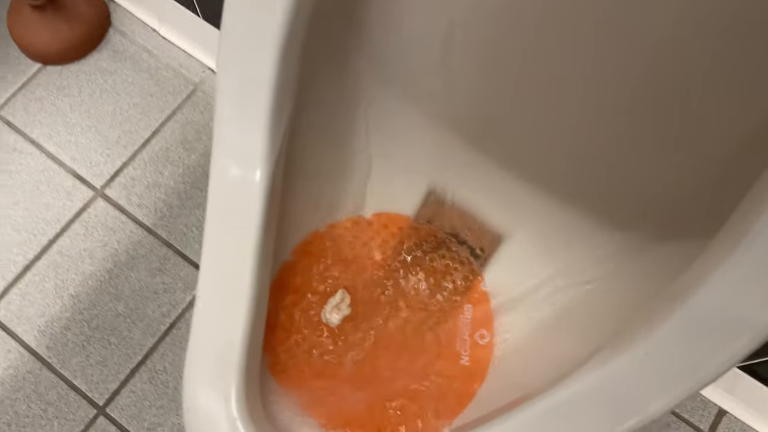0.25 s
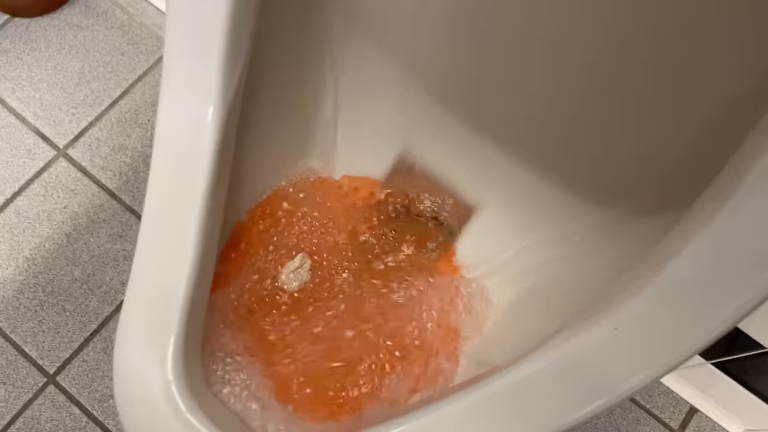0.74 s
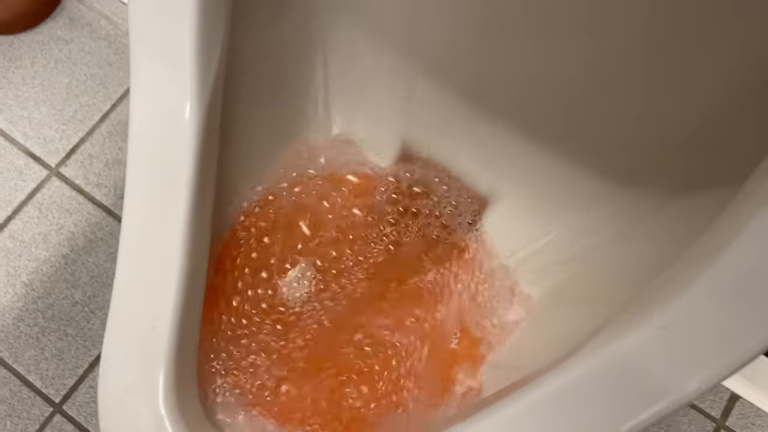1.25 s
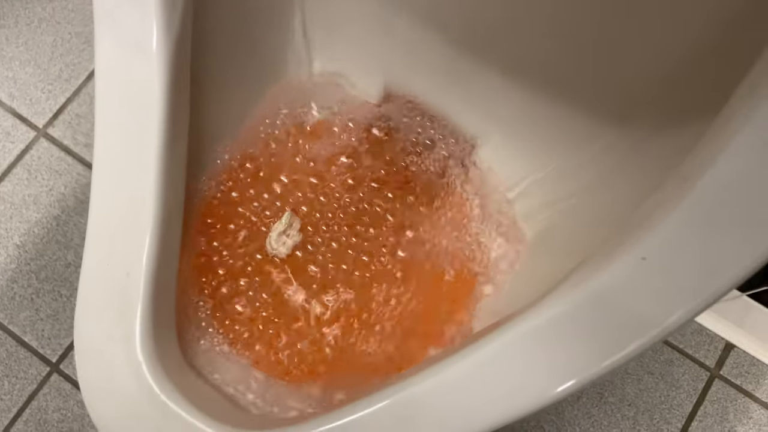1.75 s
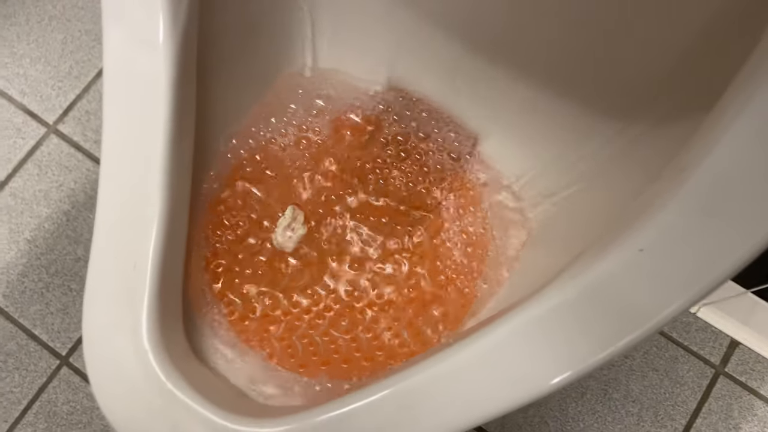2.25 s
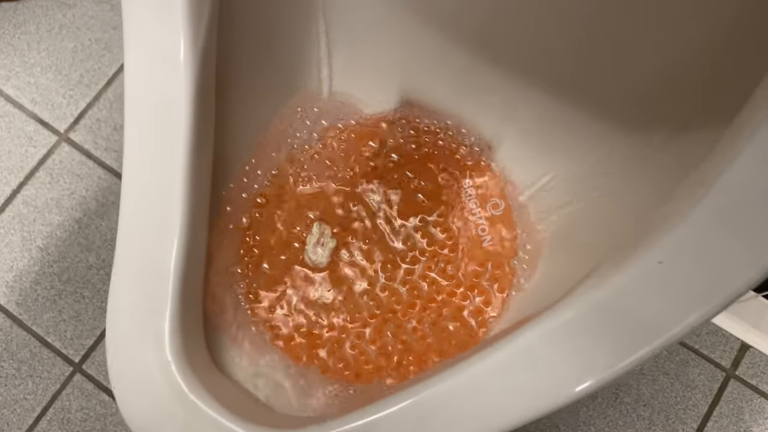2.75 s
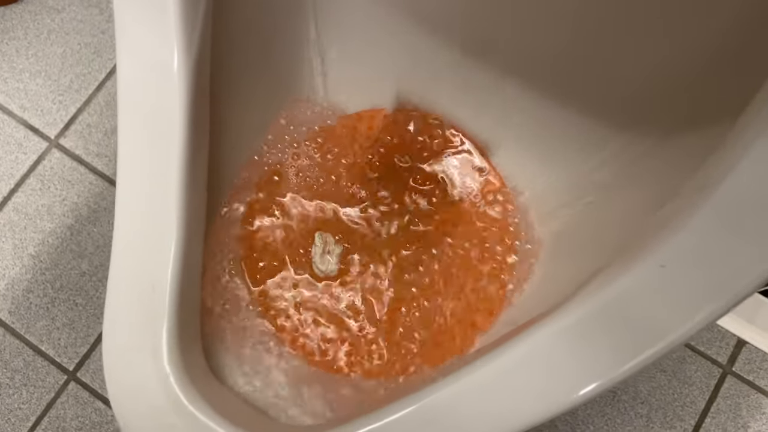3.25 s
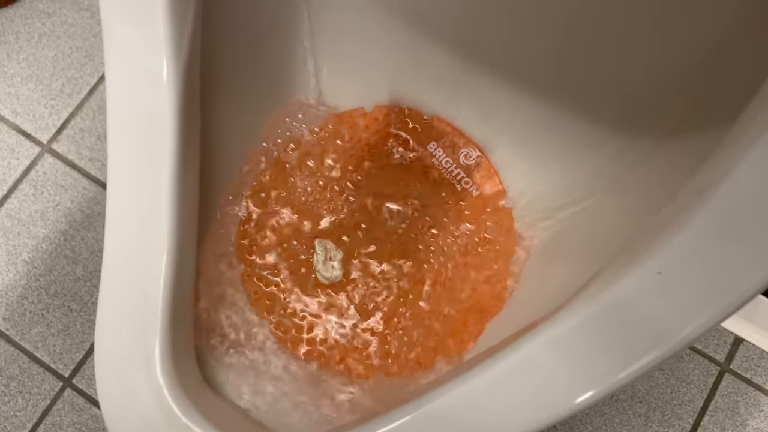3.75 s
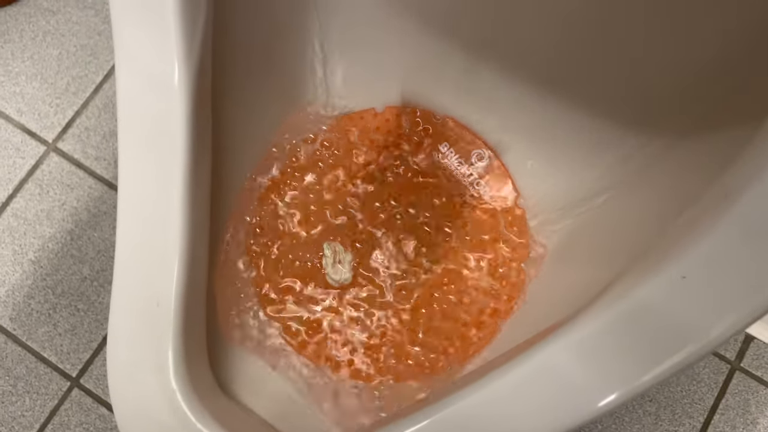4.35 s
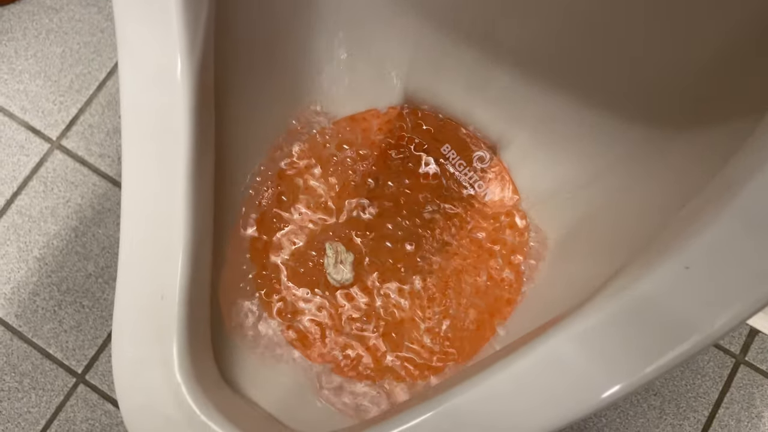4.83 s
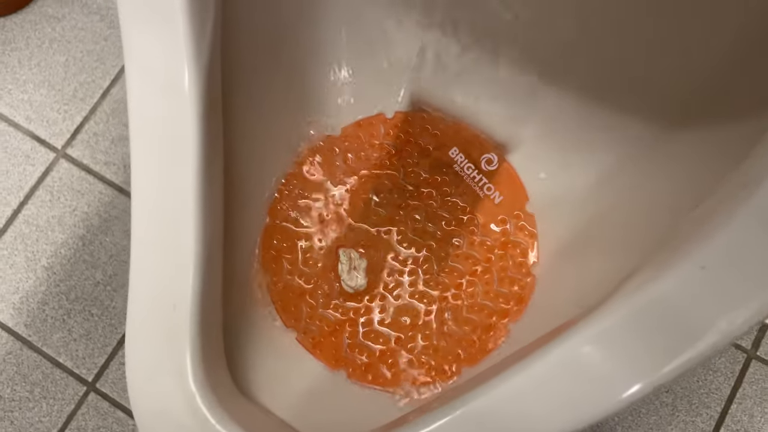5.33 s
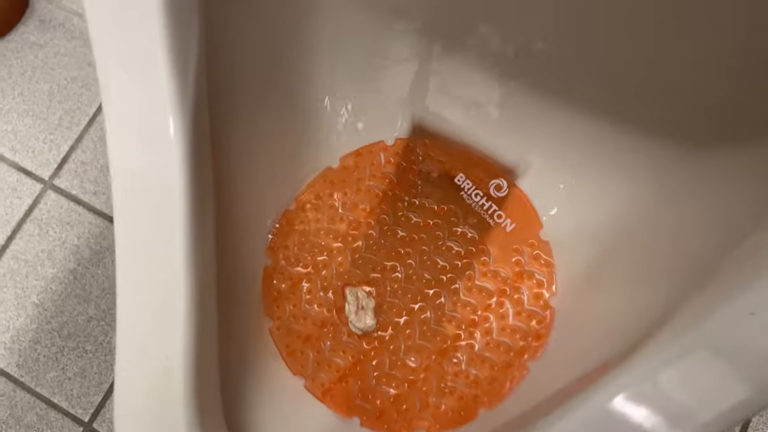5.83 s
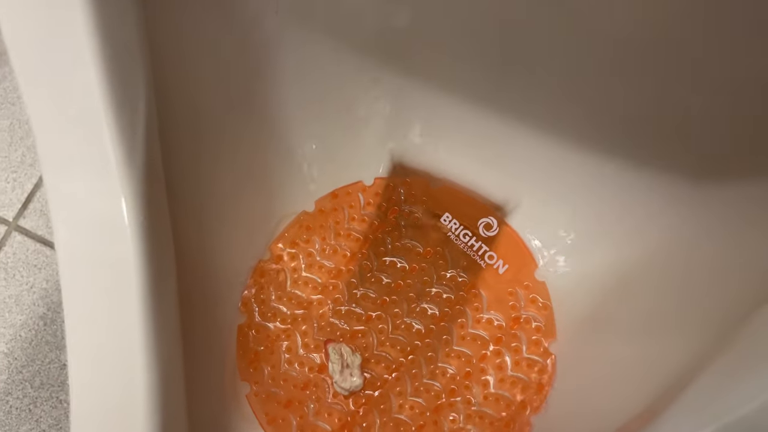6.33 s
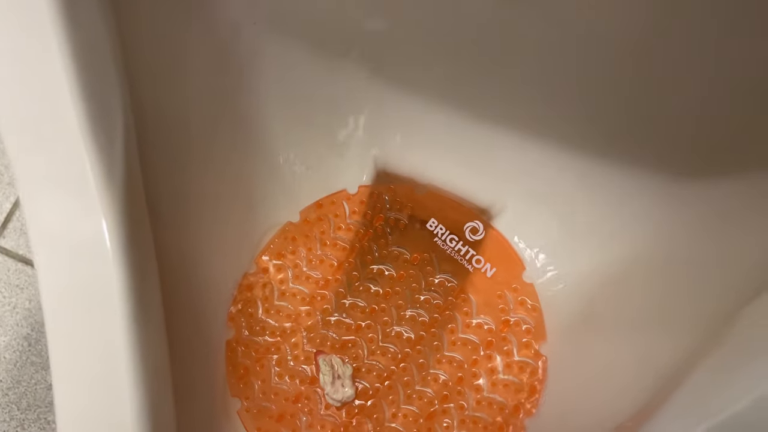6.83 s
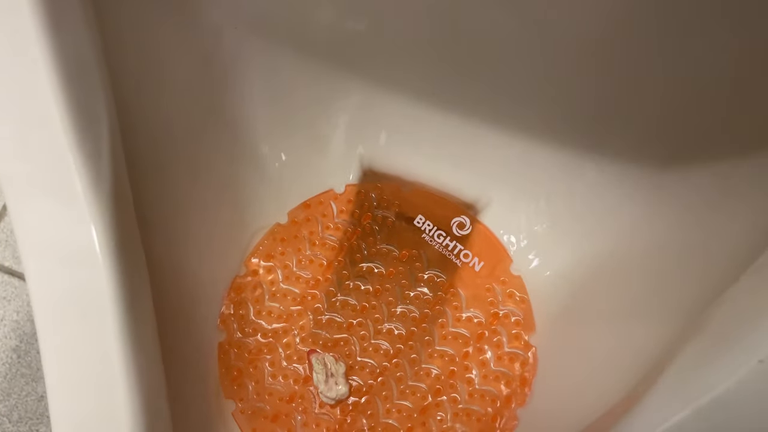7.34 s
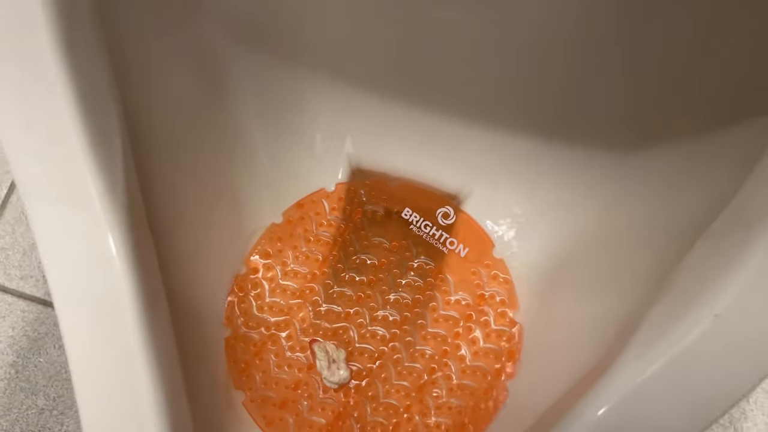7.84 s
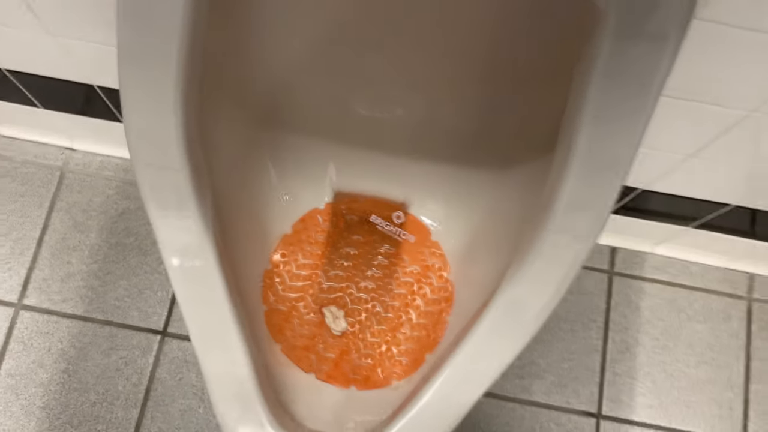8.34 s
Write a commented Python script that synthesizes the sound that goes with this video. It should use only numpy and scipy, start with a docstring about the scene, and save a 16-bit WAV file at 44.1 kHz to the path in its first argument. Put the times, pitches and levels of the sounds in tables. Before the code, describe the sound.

Water hisses down porcelain and glugs in the trap, air sputters, a quiet trickle follows, and the bowl empties with sudden loud gulps.

```python
"""Spray hisses down the porcelain of a wall urinal in a tiled restroom and fades while the trap fills and glugs.
The valve shuts and air sputters through the rim holes; the bowl drains with a rumble and a trickle.
The siphon breaks in a loud gurgle, one last sputter follows, then a brief scuff.
Hisses and rumbles are shaped noise, bubbles are gliding tones that swell and die; bowl resonances and
echoes off the walls place them. All is heard in stereo, the water's two channels differing in phase."""
import sys
import numpy as np
from scipy import signal
from scipy.fft import rfft, irfft, next_fast_len
from scipy.io import wavfile

SR = 44100
rng = np.random.default_rng(int(sys.argv[2]) if len(sys.argv) > 2 else 0)


def inscribe(sig):
    """Save sig as 16-bit PCM at rate SR to the path in sys.argv[1].

    A 1-D sig is mono; a 2-D sig holds one channel per row.
    Samples are clipped to [-1, 1] before scaling.
    """
    pcm = np.round(np.clip(np.atleast_2d(sig).T, -1, 1) * 32767)
    wavfile.write(sys.argv[1], SR, pcm.astype(np.int16))


N = 378357
TIME = np.arange(N) / SR   # s
SIZE = next_fast_len(N + SR, real=True)   # transform length, with room for tails
HZ = np.maximum(np.arange(SIZE // 2 + 1) * SR / SIZE, 1)   # frequency of every transform bin

# air resonances of the bowl and trap: centre_hz, width_hz, level_db (over the direct sound)
BOWL_MODES = [(343.3, 12.1, 7.5), (599.5, 10, -4), (718.5, 26, 5), (1019, 33, 2), (1358, 117, 4),
              (1666, 31, 4.5), (2670, 120, 4)]
# air churned into the pool: time_s, level_db, bubble_pitch_hz
POOL_CHURN = [(0, -35.5, 430), (.5, -34, 376), (1.25, -38, 348), (1.8, -41.5, 271), (2.35, -33.5, 359),
              (2.9, -41.5, 424.3), (3.5, -38.5, 417), (4.0, -44, 436), (4.6, -48.5, 399)]
# the big gulps of air as the siphon breaks: start_s, level_db, nominal_pitch_hz, thrown_spray_db
BIG_GULPS = [(6.834, -3.5, 643, -30), (6.866, -7, 452, -33), (6.926, -7, 674, -35.5),
             (6.959, -3.5, 604, -29), (6.986, -12.5, 756, -57), (7.015, -4.5, 706, -28.5),
             (7.042, -14, 466, -29), (7.070, -11, 576, -37), (7.104, -6.5, 547, -26),
             (7.164, -14, 684, -62), (7.184, -7, 564, -32), (7.212, -8, 664, -31), (7.237, -6, 710, -30),
             (7.335, -4.5, 790, -26), (7.377, -13, 573, -49), (7.434, -8.5, 690, -31.5),
             (7.472, -9, 762, -34.5), (7.641, -12, 606, -46)]
# spectrum of fine droplets: frequency_hz, density_db (per Hz)
MIST_SPECTRUM = [(1800, -12), (4000, 2), (6500, -1), (8400, -5), (10500, 1), (13800, -5), (14800, -30)]


def flush(bowl):
    """Jets hiss on the porcelain, splash into the pool and make the trap drone; they run out once the valve shuts."""
    # spectra: frequency_hz, density_db (per Hz)
    spray_spectrum = [(1300, -66), (2200, -3), (4000, 5), (6500, 5), (8400, -0.5), (10500, 8), (12500, 2),
                      (13800, 7.5), (14700, -37)]
    splash_spectrum = [(400, -66), (650, 3), (900, 2.5), (2000, 3), (3200, -9.5)]
    jets, gush = flow()
    hiss = np.hypot(jets, gush)
    splash = np.hypot(from_db(-6) * jets, gush)   # the gush splashes as strongly as it hisses
    spray = patter(bowl * response(spray_spectrum), per_s=2000, spread_db=4.8, smooth_db=-2,
                   surge_db=1.5, surge_rate=28)
    wash = patter(bowl * response(splash_spectrum), per_s=700, spread_db=3.2, smooth_db=-2,
                  surge_db=2, surge_rate=18)
    lowest_mode = resonance(BOWL_MODES[:1])
    drone = from_db(-21.5) * jets * rms_one(filtered(rng.standard_normal(N), lowest_mode ** 2))
    froth = from_db(-11) * fizz(per_s=220, low_hz=1500, high_hz=7000, spread_db=4.5, cycles=2.6)
    return hiss * (spray + froth) + splash * wash + drone


def flow(shut_s=4.68, run_out_s=0.079):
    """Strength of the rim jets, a steady flow plus a head of pressure that runs down, and of their first gush."""
    steady_db, head_db, head_fall_db_per_s = -34, -18.5, 9.5
    gush_db, gush_s, gush_length_s = -23, 0.18, 0.06
    closing_s, closing_db_per_s = 3.73, 4.5   # the valve starts to close before it shuts
    head = from_db(head_db - head_fall_db_per_s * TIME)
    closing = from_db(-closing_db_per_s * np.maximum(TIME - closing_s, 0))
    run_out = np.exp(-np.maximum(TIME - shut_s, 0) / run_out_s)
    jets = closing * run_out * np.hypot(from_db(steady_db), head)
    gush = from_db(gush_db) / (1 + ((TIME - gush_s) / gush_length_s) ** 2)
    return jets, gush


def gurgle(bowl):
    """Each gulp sinks in pitch as its cavity opens; closing water sloshes, throws droplets and rings the trap."""
    # air resonances of the trap: centre_hz, width_hz, level_db
    trap_modes = [(333, 12, 11), (1330, 34, 3), (2650, 48, -13.5)]
    # the first and the last air squeeze through the trap, chirping down: start_s, level_db, pitch_hz, swell_s
    squirt_rows = [(6.857, -21, 2400, .0065), (7.807, -13, 1100, .0015)]
    rows = gulp_rows()
    span = (BIG_GULPS[0][0], BIG_GULPS[-1][0] + .1)   # s
    gulps = bubbles(rows, glide=-.3, wobble=.06)
    # a slap, then the water settles
    force = bursts(rows, swell=0.0033) + from_db(-9.0) * bursts(rows, swell=0.0092)
    # only the big gulps throw water, which patters back
    thrown = [(s, spray_db) for s, _, _, spray_db in BIG_GULPS]
    spatter = bursts(thrown, swell=0.0024) + from_db(-12) * bursts(thrown, swell=0.0097)
    droplets = from_db(-6) * fizz(per_s=700, low_hz=1800, high_hz=6200, spread_db=4, cycles=3.5, span=span)
    mist = rms_one(filtered(rng.standard_normal(N), response(MIST_SPECTRUM)))
    mist = from_db(-12.5) * mist * from_db(5.5 * drift(120))   # flickers in level
    slosh = from_db(-14.0) * fizz(per_s=290, low_hz=257.4, high_hz=945, spread_db=0.5, cycles=2.37, span=span)
    dulled_trap = resonance(trap_modes) / (1 + (HZ / 6000) ** 2)
    ringing = filtered(force * rng.standard_normal(N), dulled_trap)
    squirt = bubbles(squirt_rows, glide=-.65)
    in_bowl = from_db(-3.2) * gulps + force * slosh + spatter * (droplets + mist)
    return filtered(in_bowl, bowl) + ringing + squirt


def gulp_rows(scatter=0.311, small_swell_s=0.00787):
    """Big sharp gulps and the softer crowd between them, scattered in pitch (octaves): rows (s, dB, Hz, swell s)."""
    swell_s, sag = 0.0025, 0.92   # time to full strength; share of its pitch that a big gulp has left by then
    pause_start_s, pause_end_s = 7.25, 7.32   # the trap seals again for a moment
    # the lesser gulps weaken as the bowl empties
    small = crowd(span=(6.89, 7.66), per_s=30, db=-11.5, fall_db_per_s=15)
    pitch = 471.4 * 2 ** (scatter * rng.standard_normal(len(small)))   # Hz
    big_rows = [(s, db, sag * hz, swell_s) for s, db, hz, _ in BIG_GULPS]
    small_rows = [(s, db, hz, small_swell_s) for (s, db), hz in zip(small, pitch)
                  if not pause_start_s < s < pause_end_s]
    return big_rows + small_rows


def bloops(cycles=3.45, rise=0.13):
    """Rounder, wobbling bubbles among the gulps rise in pitch as they surface; the lower, the longer they ring."""
    # softer air pockets: start_s, level_db, pitch_hz
    bloop_rows = [(6.914, -10.5, 562), (6.93, -17.5, 1000), (7.084, -18, 330), (7.209, -18, 335),
                  (7.378, -10, 604), (7.471, -16, 1280), (7.501, -22, 1340), (7.532, -27, 356),
                  (7.603, -20, 347), (7.704, -21, 651)]
    return bubbles([(s, db, hz, cycles / hz) for s, db, hz in bloop_rows], glide=rise, wobble=0.063)


def glugs(swell=0.0054, scatter=0.067):
    """Big round bubbles in the trap ring near the pitch of the pool (scatter in octaves) and rise a little."""
    # the biggest air pockets rising in the full trap: start_s, level_db
    glug_rows = [(2.130, -29), (2.367, -18), (2.42, -22), (2.455, -22.5), (2.495, -20.5), (2.537, -19.5),
                 (2.561, -18), (2.665, -21), (2.794, -18), (2.89, -25), (3.02, -24), (3.125, -22),
                 (3.182, -22), (3.218, -24), (3.263, -15), (3.288, -23), (3.337, -14.5), (3.488, -16.5),
                 (3.512, -17.5), (3.548, -21), (3.608, -20.5), (4.12, -18.5), (4.334, -24.5)]
    small = crowd(span=(2, 3.6), per_s=8.3, db=-25.5)   # lesser ones rise between them
    s, db = np.vstack([glug_rows, small]).T
    pool_s, _, pool_hz = np.transpose(POOL_CHURN)
    hz = np.interp(s, pool_s, pool_hz) * 2 ** (scatter * rng.standard_normal(len(s)))
    return bubbles(zip(s, db, hz, np.full(len(s), swell)), glide=0.029, wobble=0.1)


def pool(per_s=110, scatter=0.229, cycles=2.05):
    """A crowd of big bubbles rolls in the pool, scattered (octaves) round a pitch that follows the water level."""
    s, db, hz = np.transpose(POOL_CHURN)
    when = rng.random(int(per_s * N / SR)) * N / SR
    pitch = np.interp(when, s, hz) * 2 ** (scatter * rng.standard_normal(len(when)))
    churn, = gains(np.transpose([s, db]))
    return churn * rms_one(bubbles(zip(when, np.zeros(len(when)), pitch, cycles / pitch), glide=0.35))


def sputter(bowl):
    """Air breaks through water left in the rim: spit and froth over a hollow, bubbling rattle;
    later a hollow rattle with fainter spit and bursting films."""
    # air and water spitting, one curve a bout: time_s, spit_db, hollow_body_db
    bouts = [
        [(4.705, -28, -58), (4.789, -20, -35.5), (4.873, -37.5, -32), (4.967, -28.5, -29),
         (5.199, -24.5, -36.5), (5.25, -28, -30.5), (5.32, -35, -37), (5.39, -29.5, -31.5), (5.53, -33, -29)],
        [(7.915, -26, -31), (7.951, -22, -26), (8.077, -19, -27), (8.085, -23, -32.5)],
    ]
    # spectra: frequency_hz, density_db (per Hz)
    spit_spectrum = [(1200, -19.5), (2150, 5.5), (3800, -6), (5800, 0.5), (8400, -6.5), (11000, 0),
                     (13500, -1), (16000, -16)]
    hollow_spectrum = [(130, -41), (280, 5), (450, -0.5), (1100, -8.5), (1800, -17.5), (3000, -34)]
    (spit, body), (late_spit, late_body) = [gains(bout, rise=0.0011, fall=0.031) for bout in bouts]
    # as the rim empties the jet breaks into spurts
    ragged_db = np.interp(TIME, [4.8, 5.2], [1.2, 3.6])
    spurts = from_db(ragged_db * (np.minimum(drift(62), 2) - 4.5))
    spitting = spurts * patter(bowl * response(spit_spectrum), per_s=900, spread_db=3.4, smooth_db=-7,
                               surge_db=1, surge_rate=70)
    rattle = patter(bowl * response(hollow_spectrum), per_s=700, spread_db=1.5, smooth_db=-3,
                    surge_db=1.8, surge_rate=35)
    blips = fizz(per_s=90, low_hz=290, high_hz=900, spread_db=2.5, cycles=3.2, span=(4.9, 5.55))
    froth = fizz(per_s=600, low_hz=3400, high_hz=7000, spread_db=4.5, cycles=2.0, span=(4.98, 5.24))
    films = fizz(per_s=300, low_hz=2100, high_hz=7000, spread_db=4.5, cycles=2.0, span=(7.91, 8.09))
    late = from_db(-18) * films + from_db(-8) * spitting
    bubbling = filtered(from_db(-6) * body * blips + from_db(-39.5) * froth, bowl)
    hollow = (body + late_body) * rattle + bubbling
    return spit * spitting + late_spit * late + hollow


def slaps():
    """Lumps of water land with a short wet spit, each coloured by the air it traps."""
    # slaps and splats on the porcelain and the pool: start_s, level_db, centre_hz
    slap_rows = [(3.299, -24, 1400), (3.374, -27, 4700), (3.886, -28.5, 2030), (3.972, -23.5, 3120),
                 (4.703, -26, 5040), (5.284, -31, 6040), (5.339, -27, 5250), (5.8477, -35, 2110),
                 (5.953, -34, 1030), (6.353, -43, 5300), (6.471, -44, 5680), (6.533, -37, 3920),
                 (6.587, -29, 1400), (7.239, -28, 3640), (7.472, -27.5, 2070), (7.912, -33, 4570),
                 (7.972, -27.5, 4950), (8.02, -23, 4300), (8.058, -29, 5350)]
    return spits(slap_rows, swell_s=0.0016, sharpness=1.75)


def drops(cycles=4.1):
    """Drops plink in the bowl and a thin trickle goes on after the flush; finer drips are fainter and higher."""
    # single drops and small bursting bubbles: start_s, level_db, pitch_hz
    drop_rows = [(3.056, -27, 853), (3.852, -28, 579), (4.122, -34.5, 674), (5.234, -28.5, 691),
                 (5.307, -27.5, 2870), (5.365, -29.5, 2850), (5.710, -31.5, 661)]
    plinks = bubbles([(s, db, hz, cycles / hz) for s, db, hz in drop_rows], glide=-0.059, wobble=0.084)
    running, = gains([(5.3, -52.5), (6.5, -54.5), (7.6, -63), (8.2, -66.5)], rise=0.6, fall=0.57)   # (s, dB)
    when, pitch, size = rng.random((int(220 * N / SR), 3)).T   # 220 drips a second
    hz = 1300 * (12500 / 1300) ** pitch
    db = 5 * np.minimum(-np.log(1 - size), 3) - 16 * pitch
    drips = spits(zip(when * N / SR, db, hz), swell_s=.0012, sharpness=2.2)
    return plinks + running * rms_one(filtered(drips, response(MIST_SPECTRUM)))


def background():
    """The waste pipe rumbles in surges under the air noise of the room; something scuffs briefly at the end."""
    # water falling down the waste pipe: time_s, rumble_db
    drain_curve = [(0.0, -40), (0.55, -36.5), (0.83, -44), (4.73, -46.5), (5.11, -34), (5.95, -39.5),
                   (6.25, -35.5), (6.86, -36), (6.95, -25), (7.07, -30.5), (7.86, -43), (8.05, -30.5),
                   (8.15, -42), (8.58, -45)]
    # spectra: frequency_hz, density_db (per Hz)
    rumble_spectrum = [(25, -37), (40, -9.5), (65, -5), (95, 4), (125, -8), (170, 0), (300, -7.5),
                       (600, -32)]
    air_spectrum = [(50, -25.5), (90, -4), (600, -2), (2000, -22), (5000, -36.5), (14000, -52)]
    draining, = gains(drain_curve)
    rumble = draining * patter(response(rumble_spectrum), per_s=110, spread_db=3.0, smooth_db=0.5,
                               surge_db=2.5, surge_rate=9.9)
    air_noise = stereo(rng.standard_normal((2, N)))
    air = from_db(-44.0) * rms_one(filtered(air_noise, response(air_spectrum)))
    scuff = spits([(8.552, -38.5, 3330)], swell_s=0.0079, sharpness=1.0)   # (s, dB, Hz)
    return rumble + air + scuff


def patter(colour, per_s, spread_db, smooth_db, surge_db, surge_rate):
    """Droplet impacts of uneven size over the blur of countless tiny ones, arriving in surges; rms 1."""
    sizes = from_db(spread_db * np.minimum(rng.exponential(1, (2, N)), 4)) * rng.choice([-1, 1], (2, N))
    impacts = rms_one(sizes * (rng.random((2, N)) < per_s / SR))
    blur = from_db(smooth_db) * rng.standard_normal((2, N))
    surging = (impacts + blur) * from_db(surge_db * drift(surge_rate))
    return rms_one(filtered(stereo(surging), colour))


def bubbles(rows, glide, wobble=0):
    """Rows (s, dB, Hz, swell s): each air pocket swells, rings and dies; its pitch glides and wobbles (octaves)."""
    out = np.zeros(N + SR)
    for s, db, hz, swell in rows:
        age = np.arange(int(10 * swell * SR)) / (swell * SR)   # in swell times
        shape = np.interp(age, np.arange(10), rng.standard_normal(10))   # the pocket deforms as it moves
        pitch = hz * 2 ** (glide * np.tanh(age / 2 - 1 / 2) + wobble * shape)
        tone = np.sin(2 * np.pi * np.cumsum(pitch) / SR)
        at = int(s * SR)
        out[at:at + len(age)] += from_db(db) * age * np.exp(1 - age) * tone
    return out[:N]


def fizz(per_s, low_hz, high_hz, spread_db, cycles, span=(0, N / SR)):
    """Small bubbles at random moments, pitches and sizes; rms 1 within the span (s)."""
    start, length = span[0], span[1] - span[0]
    when, pitch, size = rng.random((int(per_s * length), 3)).T
    hz = low_hz * (high_hz / low_hz) ** pitch
    db = spread_db * np.minimum(-np.log(1 - size), 3)
    crackle = bubbles(zip(start + when * length, db, hz, cycles / hz), glide=0)
    return np.sqrt(length * SR / N) * rms_one(crackle)


def crowd(span, per_s, db, fall_db_per_s=0):
    """Times and levels of lesser air pockets, which break loose at a loosely even pace."""
    slip = rng.random(64)
    age = (np.arange(len(slip)) + slip) / per_s
    rows = np.column_stack([span[0] + age, db - fall_db_per_s * age])
    return rows[rows[:, 0] < span[1]]


def bursts(rows, swell):
    """Envelope of short pushes of water at rows (s, dB, ..), each peaking after `swell` seconds."""
    kicks = np.zeros(N)
    for s, db, *_ in rows:
        kicks[int(s * SR)] += from_db(db)
    r = np.exp(-1 / (swell * SR))
    return signal.lfilter([np.e / (swell * SR)], [1, -2 * r, r * r], kicks + 1e-18)


def spits(rows, swell_s, sharpness):
    """Short bursts of noise at rows (s, dB, Hz), each in a broad band of its own."""
    out, age = np.zeros(N + SR), np.arange(SR // 20) / (swell_s * SR)
    for s, db, hz in rows:
        peak = signal.iirpeak(hz, sharpness, fs=SR)
        once = signal.lfilter(*peak, rng.standard_normal(len(age)))
        spit = rms_one(signal.lfilter(*peak, once))
        at = int(s * SR)
        out[at:at + len(age)] += from_db(db) * age * np.exp(1 - age) * spit
    return out[:N]


def resonance(modes):
    """Summed response of air modes (Hz, width Hz, dB)."""
    return sum(from_db(db) / (1 + 1j * hz / width * (HZ / hz - hz / HZ)) for hz, width, db in modes)


def echoes(x, t60, low_hz, high_hz, delay):
    """Dense reflections between hard surfaces, dying by 60 dB in t60 (s) after a delay (s); unit energy."""
    band = 1 / np.hypot(1, (low_hz / HZ) ** 2) / np.hypot(1, HZ / high_hz)
    noise = filtered(stereo(rng.standard_normal((2, N))), band)
    tail = noise * from_db(-60 * np.minimum(TIME / t60, 3)) * (TIME > delay)
    return filtered(x, rfft(rms_one(tail) / np.sqrt(N), SIZE))


def stereo(pair):
    """Two unrelated signals as mid and side: alike in the bass, apart in the treble."""
    # stereo width: frequency_hz, side_over_mid_db
    width_curve = [(40, -23), (380, -5), (700, -2.5), (1400, -5.5), (2400, -0.5), (6000, -0.5), (10000, -1),
                   (16000, -44)]
    return pair[0] + filtered(pair[1], response(width_curve)) * np.array([[1], [-1]])


def gains(rows, rise=.01, fall=0.16):
    """One gain curve a column; it opens just before the first row and dies away after the last."""
    s, *columns = np.transpose(rows)
    gate = np.clip((TIME - s[0]) / rise + 1, 0, 1) * np.exp(-np.maximum(TIME - s[-1], 0) / fall)
    return [gate * from_db(np.interp(TIME, s, c)) for c in columns]


def drift(rate):
    """Slow chance with spread 1, its fluctuations mostly below the rate (Hz)."""
    return rms_one(filtered(rng.standard_normal(N), 1 / (1 + (HZ / rate) ** 2)))


def response(points):
    """A (Hz, dB) table as a gain at every frequency, falling away beyond both ends."""
    hz, db = np.transpose(points)
    curve = from_db(np.interp(np.log(HZ), np.log(hz), db))
    return curve / np.hypot(1, (hz[0] / HZ) ** 2) / np.hypot(1, (HZ / hz[-1]) ** 2)


def filtered(x, gain):
    """Apply a frequency response."""
    return irfft(rfft(x, SIZE) * gain, SIZE)[..., :N]


def rms_one(x):
    """Scale to rms 1."""
    return x / np.sqrt(np.mean(x ** 2) + 1e-20)


def from_db(db):
    """Decibels to gain."""
    return 10 ** (np.asarray(db) / 20)


def scene():
    """Water rings in the bowl, scatters off its walls and fills the tiled room; its two channels differ in phase."""
    # phase of the right channel against the left: frequency_hz, lag_radians (negative: ahead)
    channel_phase = [(0, 0), (2000, 1.3), (5000, 1.3), (14400, -9.4)]
    bowl = 1 + resonance(BOWL_MODES)
    bubbling = filtered(pool() + glugs() + bloops() + drops(), bowl)
    near = bubbling + slaps() + gurgle(bowl) + sputter(bowl)
    scattered = from_db(-2.0) * echoes(near, t60=0.047, low_hz=2020, high_hz=9500, delay=0.00074)
    water = flush(bowl) + near + scattered
    right_lag = np.interp(HZ, *np.transpose(channel_phase))
    water = filtered(water, np.exp(-1j * right_lag * np.array([[0], [1]])))
    room = from_db(-17.5) * echoes(water, t60=0.75, low_hz=150, high_hz=4630, delay=0.016)
    return water + room + background()


def record(dry):
    """Peaks stop at full scale, then the treble above 15.8 kHz is cut steeply."""
    treble_cut = signal.ellip(10, .1, 80, 15800, fs=SR, output="sos")
    return signal.sosfilt(treble_cut, np.clip(dry, -1, 1))


dry = scene()
out = record(dry)
inscribe(out)
```